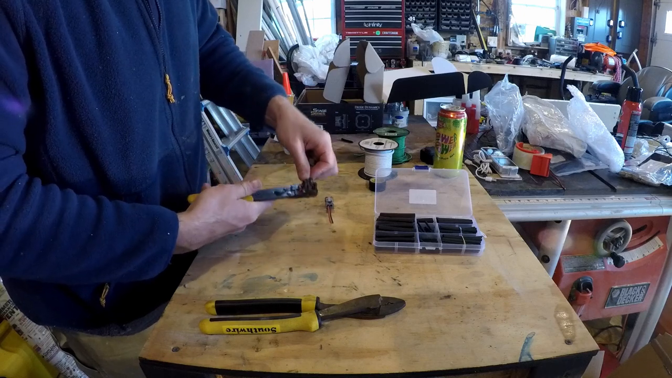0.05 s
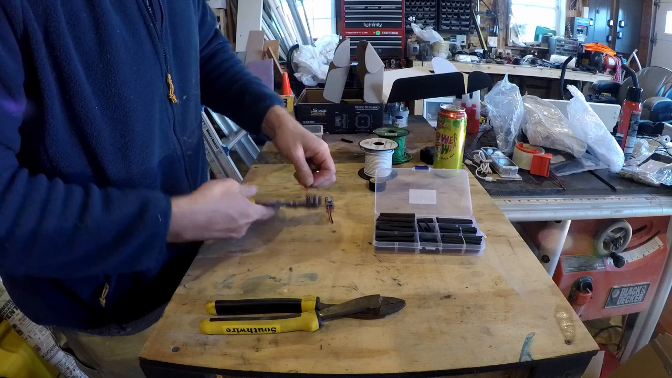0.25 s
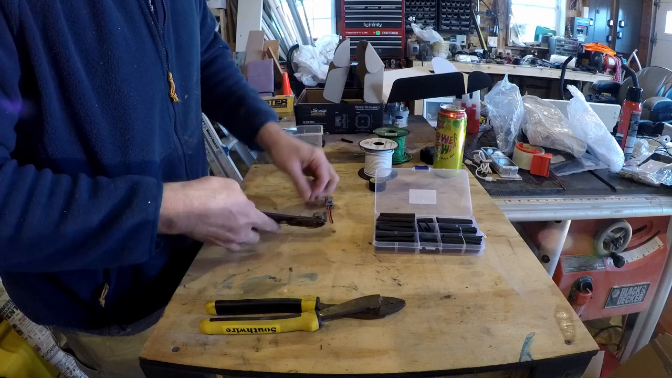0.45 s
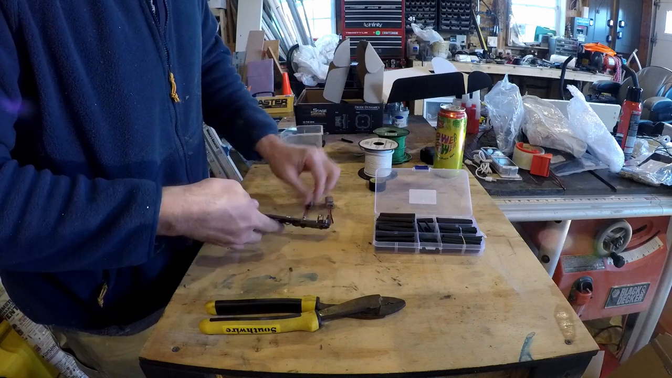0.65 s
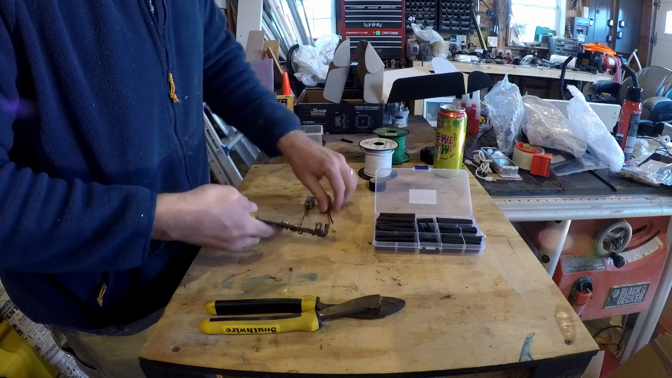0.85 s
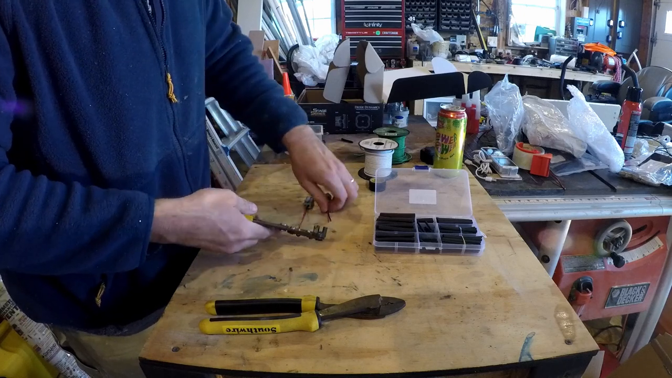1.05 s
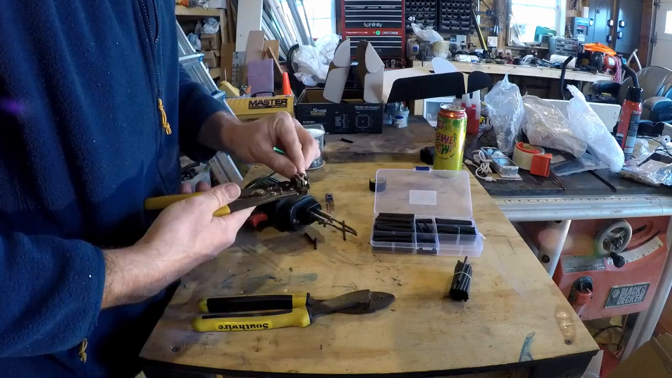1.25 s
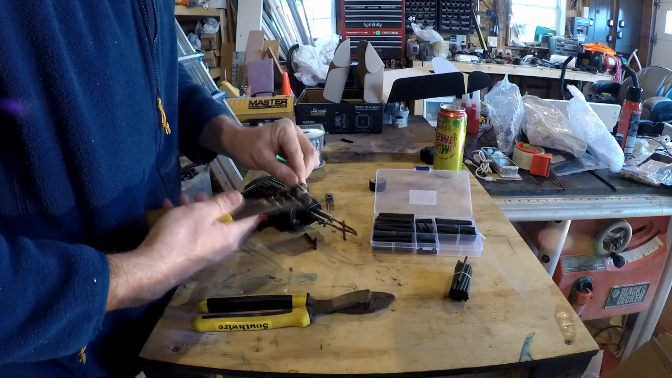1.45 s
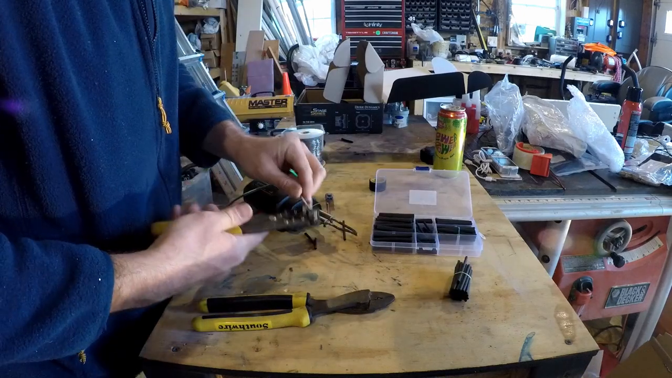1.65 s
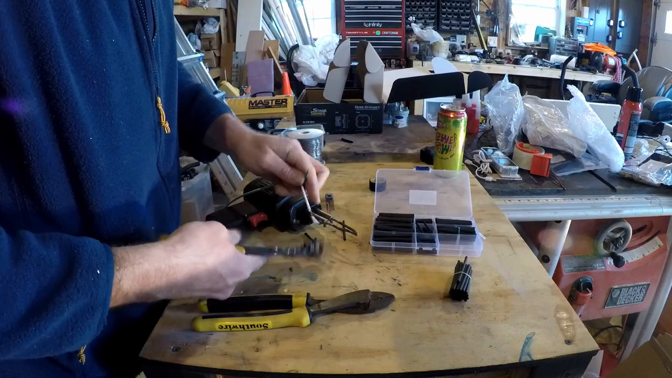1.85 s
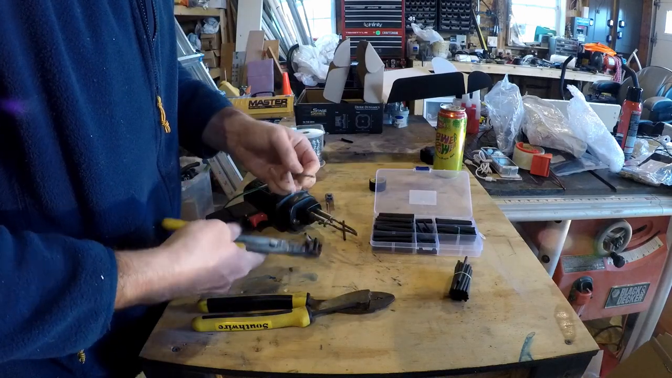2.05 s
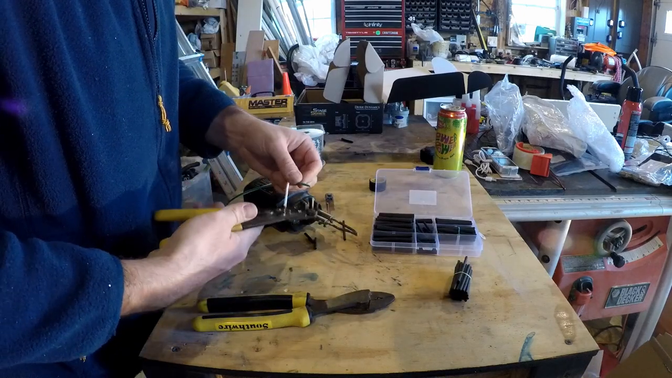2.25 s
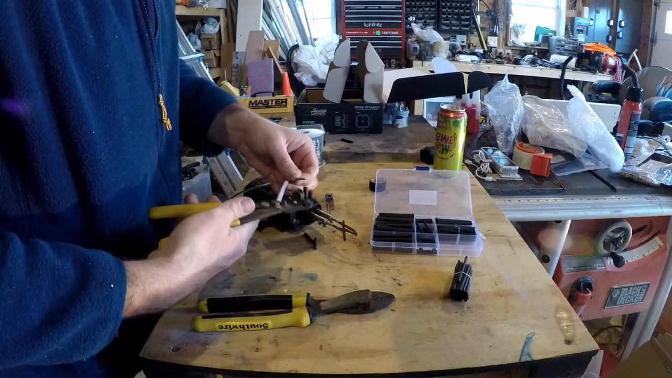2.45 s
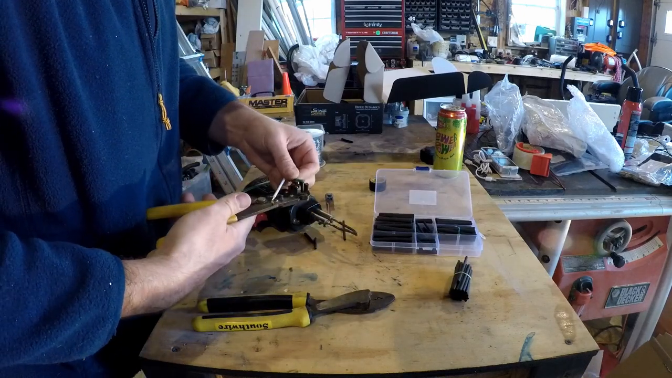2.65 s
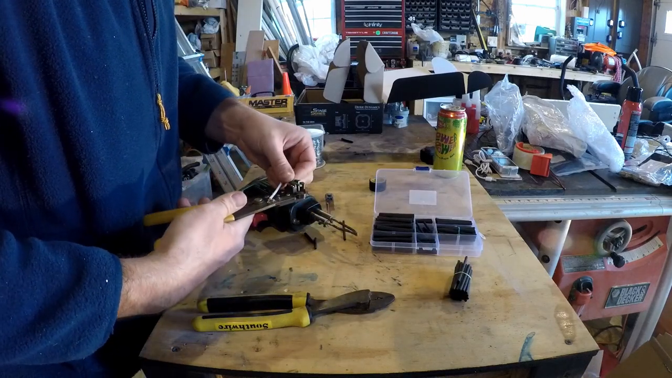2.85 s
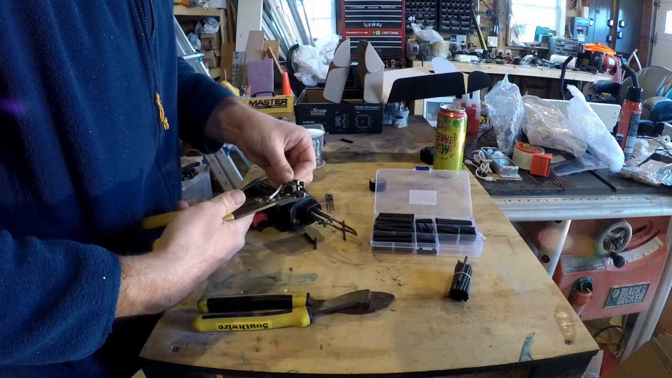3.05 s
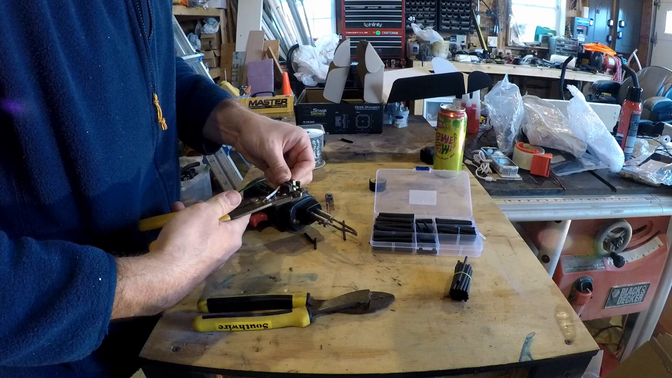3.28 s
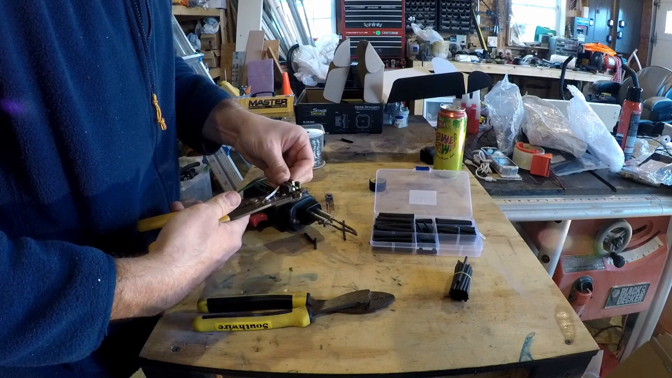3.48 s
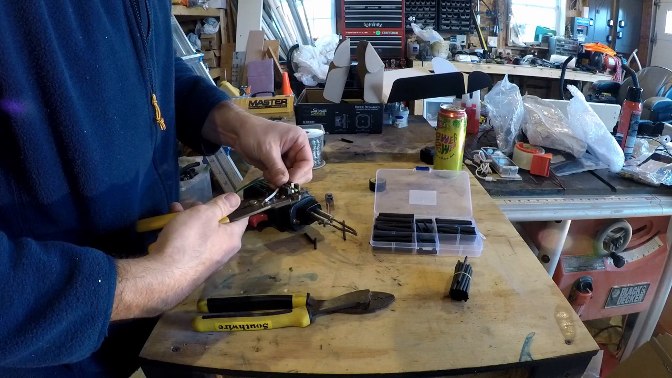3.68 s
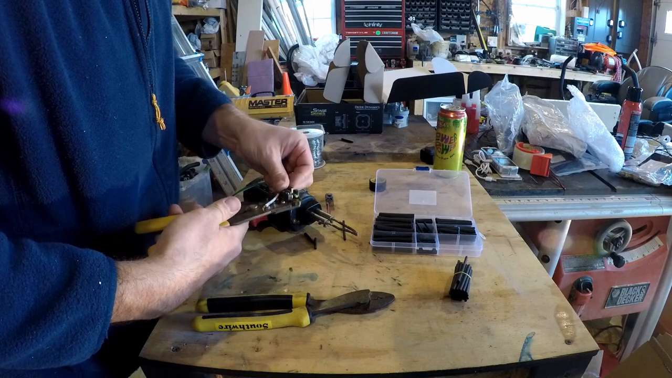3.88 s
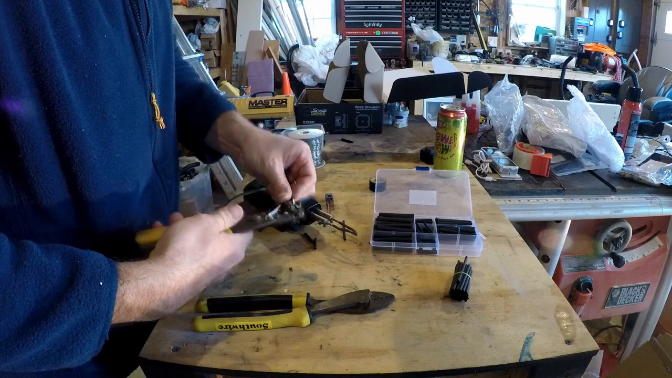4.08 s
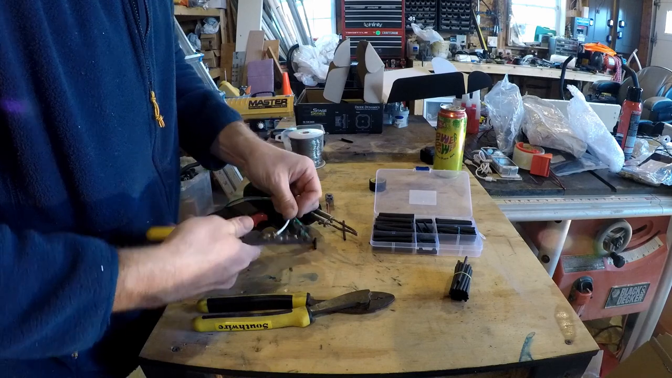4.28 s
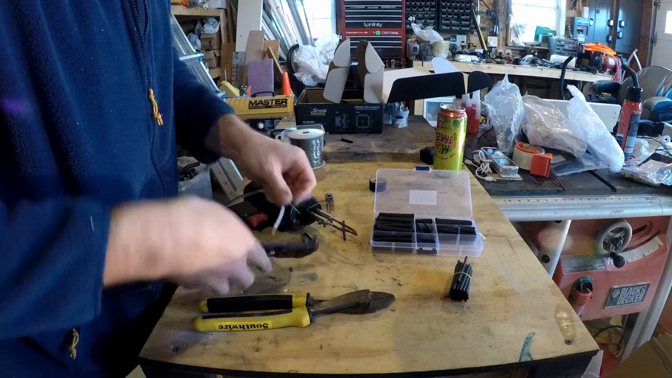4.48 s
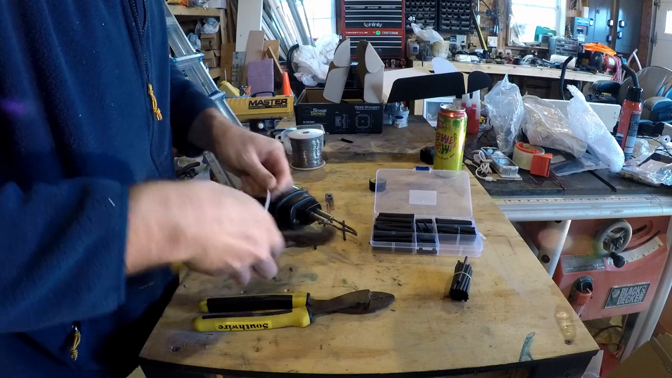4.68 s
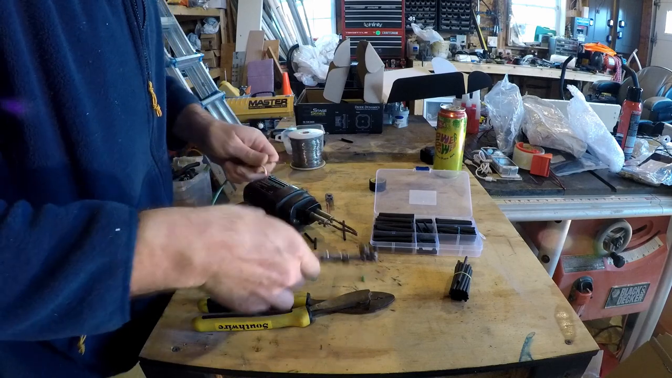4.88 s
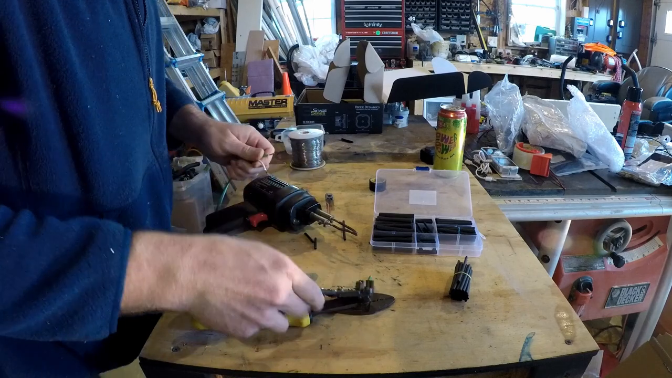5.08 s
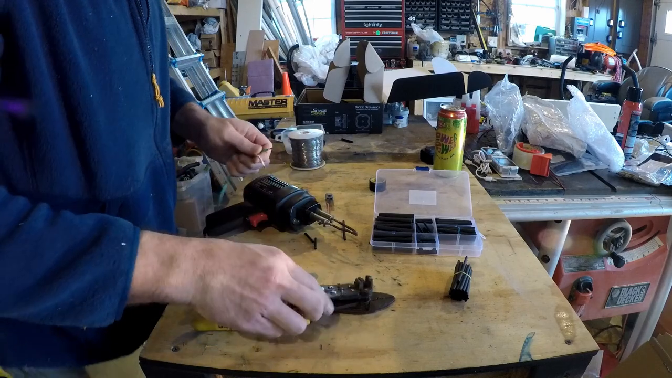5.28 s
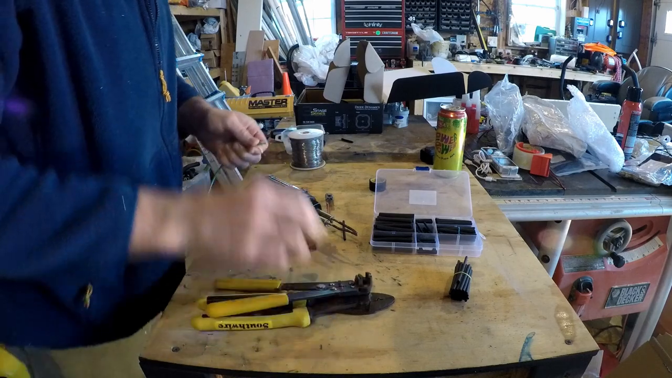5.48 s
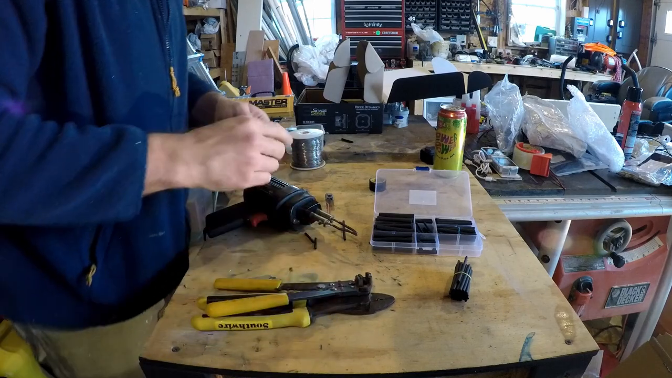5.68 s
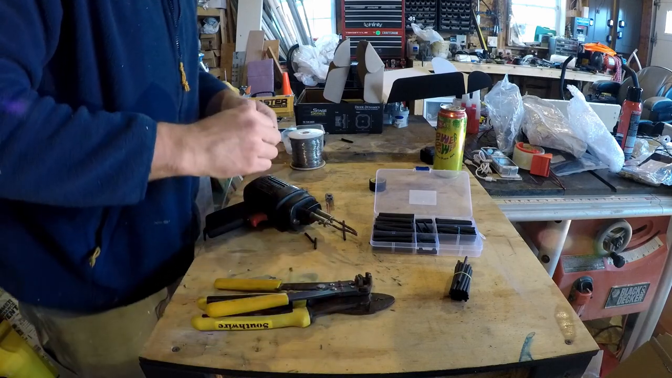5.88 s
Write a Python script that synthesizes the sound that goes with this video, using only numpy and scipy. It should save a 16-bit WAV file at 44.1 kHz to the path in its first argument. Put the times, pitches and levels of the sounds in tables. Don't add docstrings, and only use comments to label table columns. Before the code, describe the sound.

Three rounds of hand-tool work: a crisp bite, brief stuttering scrape, and a hard bright double-click snap. Little cut pieces tap the wood between them. After a long, nearly silent pause comes the third, strongest scrape, then a heavy two-part clatter as the tool lands on the bench against another tool. Close, dry microphone; short garage reverberation over soft hiss and low rumble.

```python
import sys
import numpy as np
from scipy import signal
from scipy.fft import rfft, irfft, next_fast_len
from scipy.io import wavfile
from scipy.ndimage import uniform_filter1d

SR = 44100
rng = np.random.default_rng(int(sys.argv[2]) if len(sys.argv) > 2 else 0)


def natural_amplitude(level_db):
    exponent = np.asarray(level_db, float) / 20
    return 10 ** exponent


def bounce(signal):
    frames = np.transpose(np.atleast_2d(signal))
    limited = np.clip(frames, -1, 1)
    pcm = np.round(limited * 32767).astype(np.int16)
    wavfile.write(sys.argv[1], SR, pcm)


N = 261424

# [freq_hz, density_db_per_hz]
AIR_SPECTRUM = [(35, -27.5), (60, -2.5), (185, 0), (303, -1.5), (375, -4), (1010, -10.5), (1360, -14.5),
                (4120, -20.5), (6140, -22), (7070, -24), (14000, -26.5), (15300, -27.5), (16500, -57.5)]
# [time_s, level_db]
AIR_LEVEL = [(0, -57.5), (1.148, -58), (1.249, -59.5), (3.6, -61), (5.93, -58.5)]
# [peak_s, level_db, rise_db_per_s]
NUDGES = [(0.64, -60, 80), (1.55, -60.5, 69), (2.0, -64.5, 84), (3.53, -63, 93), (4.161, -57, 120),
          (4.49, -60, 131.5), (4.841, -81.5, 72), (5.1, -45.5, 894), (5.399, -43, 81)]
# [freq_hz, gain_db]
MIC_BAND = [(20, 0), (15330, 0), (15520, -15), (16600, -19)]
# [delay_s, gain_db]
NEAR_ECHOES = [(.0075, -22), (.013, -32.5), (.021, -34)]
# [freq_hz, t60_s]
GARAGE_T60 = [(100, 0.4), (500, 0.41), (2000, 0.38), (6000, 0.29), (15000, 0.14)]
# [freq_hz, gain_db]
GARAGE_RETURN = [(200, -1), (1500, 3), (5500, 1.5), (9000, -2), (14000, 0.5)]

# [freq_hz, width_hz, gain_db]
BENCH_MODES = [(102.8, 12, -3.5), (195, 27, 0.5), (250.8, 23, -2.5), (291, 23.7, 0.5), (335, 74, -6),
               (416, 30, -4), (551, 52, -1), (748, 71, -11), (815, 54, -5.5), (1010, 21, -5),
               (1190, 90, -16.5), (1280, 410, -12), (1931, 180, -14), (2420, 220, -17.5)]
# [freq_hz, width_hz, gain_db]
BOARD_MODES = [(606, 164, 2.5), (780, 154, 6), (976, 200, 4), (1270, 180, 0)]
# [freq_hz, width_hz, gain_db]
KNOCK_MODES = [(1570, 670, -0.5), (1946, 400, 3.5), (2460, 960, -2)]
# [freq_hz, width_hz, gain_db]
STEEL_MODES = [(3260, 1260, 2.5), (4730, 1400, 8), (6350, 670, 10)]
# [freq_hz, width_hz, gain_db]
EDGE_MODES = [(7880, 1300, -2.5), (11300, 4400, -4), (13300, 5100, -5)]
# [freq_hz, width_hz, gain_db]
WOOD_MODES = [(510, 350, -1.5), (765, 350, 2.5), (1196, 880, -0.5)]
# [freq_hz, width_hz, gain_db]
PIECE_MODES = [(1864, 400, -1.5), (2670, 370, 3), (3540, 510, 1.5), (4930, 790, -5)]
# [freq_hz, width_hz, gain_db]
GRIP_MODES = [(470, 500, 4.5), (1168, 1100, -1.5)]
# [freq_hz, width_hz, gain_db]
HANDLE_MODES = [(1930, 1300, -1.5), (2610, 480, 6), (3313, 1900, 1), (4480, 1700, 0)]
# [freq_hz, width_hz, gain_db]
PIVOT_MODES = [(2920, 2250, 5.5), (2710, 100, -9)]
# [freq_hz, width_hz, gain_db]
JAW_MODES = [(5650, 2300, 1), (8320, 980, 8), (9610, 5100, -0.5)]
# [freq_hz, width_hz, gain_db]
TIP_MODES = [(11290, 1200, -4.5), (12580, 1900, -2), (14860, 1400, -3.5)]

# [blow_s, level_db, contact_s]
THUDS = [(0.64, -30, 0.00096), (1.533, -37, 0.0003), (4.144, -34, 0.0013), (4.461, -38, 0.0021),
         (5.092, -4.5, 0.0011), (5.096, -12.5, 0.0029), (5.101, -15, 0.00094), (5.109, -15, 0.001),
         (5.122, -14.5, 0.00098), (5.229, -23.5, 0.00059), (5.314, -14, 0.001), (5.328, -11.5, 0.00175),
         (5.353, -2.5, 0.00238), (5.36, -3.5, 0.0025), (5.37, -23.5, 0.0015), (5.388, -11.5, 0.0019),
         (5.409, -22.5, 0.0017), (5.424, -17, 0.0012), (5.448, -13.5, 0.00206), (5.475, -15, 0.00072),
         (5.504, -17.5, 0.0019), (5.52, -29.5, 0.003)]
# [peak_s, level_db, rise_db_per_s, fall_db_per_s]
DRAGS = [
    (0.935, -44, 304, 159),
    (1.1, -58.5, 39, 151),
    (4.46, -51, 57, 97),
    (4.56, -49.5, 603, 94),
    (5.332, -30.5, 894, 600),
    (5.364, -20, 803, 148),
]
# [time_s, level_db]
RATTLE_LEVEL = [
    (5.318, -47),
    (5.34, -53),
    (5.36, -34.5),
    (5.385, -54),
    (5.42, -58.5),
    (5.455, -64),
    (5.469, -75),
]
# [start_s, piece_db, wood_over_piece_db, fizz_over_piece_db]
OFFCUTS = [(0.638, 4.5, -7.5, -17.5), (0.6424, -8, -3, -24), (0.65, -22, 10.5, -25),
           (0.879, -40.5, 5.5, -23), (0.947, -31, -1.5, -19), (1.1355, -43, 1, -13),
           (2.1153, -22.5, -4, -5), (2.126, -32, 2, -6), (2.2402, -33, -2, -8), (2.2637, -35.5, -4, -1),
           (4.6455, -25, -5, -9), (4.6568, -28, -3, -7), (4.6798, -36, -2, -10), (4.6916, -31.5, -11, -6.5),
           (4.719, -36, -12, -11), (4.7347, -43, -15, -4), (5.9052, -24.5, 3, -22), (5.9102, -34, 7.5, -33),
           (5.922, -36, 8.5, -9)]
# [start_s, board_db, grip_over_board_db]
KNOCKS = [(5.0908, -7, 3), (5.0937, -9, -12.5), (5.1015, 2, -8), (5.1103, 4.5, -11.5), (5.1145, -3.3, -12),
          (5.124, -14, 0), (5.2305, -17, -16), (5.236, -17, -21), (5.2491, -20, -8), (5.314, -11, 4),
          (5.323, -15, -11), (5.345, -14, -28), (5.3558, -3, -14), (5.363, -7.5, -29), (5.3724, -22.5, -26),
          (5.3893, 1.5, -24), (5.3932, -1, -4.5), (5.3965, -6.5, -3), (5.4165, -22.5, 3.5),
          (5.428, -13, -5.5), (5.434, -16, -12), (5.443, -26, -23), (5.4755, -3, -7), (5.4797, -10.5, -5)]
# [start_s, steel_db, edge_over_steel_db]
CLINKS = [(5.0906, 2.5, -4), (5.0937, -10.5, -5), (5.1008, -7, -7.5), (5.1035, -20, 8), (5.1103, -21, -15),
          (5.1145, -23, -18), (5.124, -32, -11), (5.2491, -37, 2), (5.314, -15, 2.5), (5.3294, -24, -13),
          (5.345, -30, -4), (5.3525, -29, -3), (5.3558, -27.5, 12), (5.363, -35, 1), (5.3724, -26.5, 4),
          (5.3893, -34, 10), (5.3965, -33, -7), (5.4135, -26, -7), (5.428, -44, 13), (5.434, -34, 10.3),
          (5.452, -35, -1), (5.4755, -46, -13)]
# [start_s, level_db, place_1_grip_4_tip, loss_db_per_part]
TICKS = [(0.094, -20, 3.53, 18), (0.1518, -20, 1.32, 15), (1.8472, -48, 2.9, 3), (2.7081, -35, 2.7, 11),
         (2.8075, -38, 2.4, 6), (3.1607, -35.5, 2.4, 9), (4.2042, -29, 1.05, 5.5), (4.4831, -39.5, 2.3, 9),
         (4.5026, -35.5, 3.0, 15), (4.517, -35, 2.6, 14), (4.853, -39.5, 3.5, 8)]
# [start_s, level_db, place_1_grip_4_tip, loss_db_per_part]
SLIPS = [(0.2186, -29, 3.0, 11), (0.2217, -23.5, 2.7, 3), (0.2404, -29.5, 2.0, 12), (0.246, -21.5, 2.8, 7),
         (0.2572, -28, 3.4, 8.5), (0.261, -37.5, 3.0, 2.5), (0.2674, -30.5, 2.2, 11), (0.2735, -29, 4.0, 4),
         (0.295, -32, 2.0, 12), (1.7062, -41, 3.8, 3), (1.7136, -26.5, 2.4, 6), (1.7164, -18, 2.33, 6.5),
         (1.7264, -24.5, 2.0, -1), (1.7289, -17, 2.6, 15), (1.7311, -17, 3.05, 13),
         (4.3178, -21.5, 2.4, 6.5), (4.3205, -19, 2.6, 9.5), (4.3305, -8, 2.6, 20), (4.3332, -14.5, 3.5, 9),
         (4.3348, -12, 3.1, 8), (4.343, -26, 3.4, 6), (4.3462, -28, 3.0, 9), (4.3481, -24, 2.1, 6),
         (4.3507, -11.5, 3.4, 17.5)]
# [touch_s, touch_db, gap_s, squeeze_db, brightness_db_per_part]
BITES = [
    (0.0403, -24.5, 0.015, -15.5, -2.5),
    (1.5241, -16, 0.0098, -7, 1.9),
    (4.1338, -20.5, 0.0082, -3, 1),
]
# [grip_db, handle_db, jaw_db, tip_db, chatter_t60_s]
BITE_STAGES = [
    (-3.5, 1.5, 2, -14, 0.018),
    (-24.5, -2.1, -25.5, -16.5, 0.0019),
    (-18.5, -10, -19, -22, 0.036),
]
# [snap_s, snap_db, gap_s, rebound_db, brightness_db_per_part]
SNAPS = [
    (0.4993, -2, 0.0033, -4.5, 0.4),
    (1.971, -5.5, 0.0018, -7, 0.5),
    (4.559, -4.5, 0.0028, -4.5, 1.1),
]
# [grip_db, handle_db, jaw_db, tip_db, chatter_t60_s]
SNAP_STAGES = [
    (-35, -18, -4, 3.16, 0.0059),
    (-24, -6, -0.7, -2.7, 0.0077),
    (-25.5, -21.5, -16, -12, 0.0035),
]

HARD_SHORTENS = 0.35
BENCH_BLOW = 1.3


def along(points, hz):
    f, v = np.transpose(points)
    return np.interp(np.log(hz + 1), np.log(f + 1), v)


def filtered(x, response):
    n = x.shape[-1]
    m = next_fast_len(n + min(n, SR // 2))
    return irfft(rfft(x, m) * response(np.fft.rfftfreq(m, 1 / SR)), m)[..., :n]


def ringing(force, modes, order):
    def body(f):
        total = 0
        for k, (center, width, db) in enumerate(modes):
            resonance = 1j * f * width / (center * center - f * f + 1j * f * width)
            total = total + (-1) ** k * natural_amplitude(db) * resonance
        return total ** order

    energy = np.mean(np.abs(body(np.linspace(0, SR / 2, 4000))) ** 2)
    return filtered(force, body) / np.sqrt(energy)


def radiated(force, modes, blur):
    def power(f):
        total = 0
        for center, width, db in modes:
            loss = (f * blur * width) ** 2
            total = total + natural_amplitude(2 * db) * loss / ((center * center - f * f) ** 2 + loss)
        return total

    energy = np.mean(power(np.linspace(0, SR / 2, 4000)) ** 2)
    return filtered(force, power) / np.sqrt(energy)


def laid(times, shapes):
    at = np.round(times * SR).astype(int)[:, None] + np.arange(shapes.shape[1])
    return np.bincount(at.ravel(), shapes.ravel(), N + shapes.shape[1])[:N]


def swell(peak_s, db, rise, fall):
    late = np.arange(N) / SR - np.asarray(peak_s)[:, None]
    slope = np.where(late < 0, np.abs(rise)[:, None], -np.abs(fall)[:, None])
    return natural_amplitude(db[:, None] + slope * late).sum(axis=0)


def background():
    hz, t, z = signal.stft(rng.standard_normal(N + 512), SR, nperseg=512)
    field = uniform_filter1d(uniform_filter1d(rng.standard_normal(z.shape), 5, 0), 12, 1)
    patches_db = 1.2 * field / field.std() / (1 + hz[:, None] / 1500)
    noise = signal.istft(z * natural_amplitude(patches_db), SR, nperseg=512)[1][:N]
    air = filtered(noise, lambda f: natural_amplitude(along(AIR_SPECTRUM, f)))
    level_db = np.interp(np.arange(N) / SR, *np.transpose(AIR_LEVEL))
    return air / air.std() * natural_amplitude(level_db)


def shake():
    still_db, settle_db_per_s = -68.5, 77
    t = np.arange(N) / SR
    low = ringing(rng.standard_normal(N), [(39.8, 68, 0)], order=2)
    sway = natural_amplitude(-44.5) * np.exp(-((t - 5.81) / 0.07) ** 2)
    s, db, rise = np.transpose(NUDGES)
    return low * (natural_amplitude(still_db) + swell(s, db, rise, np.full_like(s, settle_db_per_s))) + sway


def near(x):
    return x + sum(natural_amplitude(db) * np.pad(x, (round(s * SR), 0))[:N] for s, db in NEAR_ECHOES)


def garage(x):
    hz, t, z = signal.stft(rng.standard_normal(SR * 3 // 4), SR, nperseg=256)
    decay_db = along(GARAGE_RETURN, hz)[:, None] - 60 * t / along(GARAGE_T60, hz)[:, None]
    tail = signal.istft(z * natural_amplitude(decay_db), SR, nperseg=256)[1]
    tail *= 1 - np.exp(-np.arange(len(tail)) / SR / .012)
    return signal.fftconvolve(x, tail / np.sqrt(SR / 50))[:N]


def bench():
    s, db, contact_s = np.transpose(THUDS)
    u = np.arange(SR // 100) / SR / np.clip(contact_s, .0002, .008)[:, None]
    push = np.sin(np.pi * np.minimum(u, 1))
    blows = laid(s, natural_amplitude(db - 1.0)[:, None] * push / push.sum(axis=1, keepdims=True))
    grains = rng.standard_normal(N) * (rng.random(N) < .02)
    slide = swell(*np.transpose(DRAGS))
    return ringing(10 * blows + natural_amplitude(9.5) * slide * grains, BENCH_MODES, order=1)


def rattle():
    s, db = np.transpose(RATTLE_LEVEL)
    grains = rng.standard_normal(N) * (rng.random(N) < .05)
    level = np.interp(np.arange(N) / SR, s, natural_amplitude(db), 0, 0)
    return ringing(natural_amplitude(1.5) * level * grains, STEEL_MODES + EDGE_MODES[:1], order=1)


def contacts(table, parts, blow, wet_db):
    s, *levels, t60 = np.transpose(table)
    t = np.arange(SR // 25) / SR
    fade = natural_amplitude(-60 * t / np.clip(t60, .001, .04)[:, None]) * (1 - np.exp(-t / .00015))
    chatter = fade * rng.standard_normal(fade.shape)
    chatter[:, 4] += blow * np.linalg.norm(chatter, axis=1)
    sound = 0
    for db, modes in zip(levels, parts):
        ring = ringing(chatter, modes, order=2)
        ring = ring / np.linalg.norm(ring, axis=1, keepdims=True)
        direct = laid(s, natural_amplitude(db + 1.75)[:, None] * ring)
        all_round = radiated(laid(s, natural_amplitude(db)[:, None]), modes, blur=2.2)
        sound = sound + near(direct) + natural_amplitude(wet_db) * garage(all_round)
    return sound


def chatter_t60(t60_s, db):
    return t60_s * natural_amplitude(-HARD_SHORTENS * db)


def paired(rows, t60_s):
    return [(s, db, db + over, chatter_t60(t60_s, db)) for s, db, over in rows]


def offcuts():
    rows = []
    for s, db, wood, fizz in OFFCUTS:
        fizz_db = db + fizz
        rows.append((s, db + wood, db, fizz_db, fizz_db - 20.5, chatter_t60(0.017, db)))
    return contacts(rows, [WOOD_MODES, PIECE_MODES, JAW_MODES, TIP_MODES], BENCH_BLOW, wet_db=-12.0)


def knocks():
    return contacts(paired(KNOCKS, 0.018), [BOARD_MODES, KNOCK_MODES], BENCH_BLOW, wet_db=-15.0)


def clinks():
    return contacts(paired(CLINKS, 0.0037), [STEEL_MODES, EDGE_MODES], BENCH_BLOW, wet_db=-11.5)


def placed(rows, t60_s, palm_db):
    parts = np.arange(4)
    out = []
    for s, db, place, loss in rows:
        levels = db - loss * np.abs(parts + 1 - place) + palm_db * (parts == 0)
        out.append((s, *levels, t60_s))
    return out


def closing(rows, stages, settle_s):
    tilt = np.arange(4) - np.arange(4).mean()
    out = []
    for s, db, gap, second_db, bright in rows:
        times = (s, s + gap, s + gap + settle_s)
        for at, level, stage in zip(times, (db, second_db, second_db), stages):
            out.append((at, *(level + np.array(stage[:4]) + bright * tilt), stage[4]))
    return out


def bites():
    rows = closing(BITES, BITE_STAGES, settle_s=0.001473)
    return contacts(rows, [GRIP_MODES, PIVOT_MODES, JAW_MODES, TIP_MODES], blow=1.9, wet_db=-15.5)


def snaps_and_slips():
    snaps = closing(SNAPS, SNAP_STAGES, settle_s=0.0043)
    slips = placed(SLIPS, t60_s=0.012, palm_db=-13.5)
    ticks = placed(TICKS, t60_s=0.006, palm_db=-2.2)
    tool = [GRIP_MODES, HANDLE_MODES, JAW_MODES, TIP_MODES]
    return contacts(snaps + slips + ticks, tool, blow=1.1, wet_db=-12)


def scene():
    wood = bench() + rattle()
    bench_sound = near(wood) + natural_amplitude(-10.5) * garage(wood)
    laid_down = knocks() + clinks()
    working = bites() + snaps_and_slips()
    return (background() + shake() + bench_sound + offcuts() + laid_down + working)[None]


def roll_off(x):
    return signal.sosfilt(signal.butter(12, 16610, fs=SR, output="sos"), x)


def record(dry):
    mix = filtered(dry, lambda f: natural_amplitude(along(MIC_BAND, f)))
    return roll_off(mix)


dry = scene()
out = record(dry)
bounce(out)
```